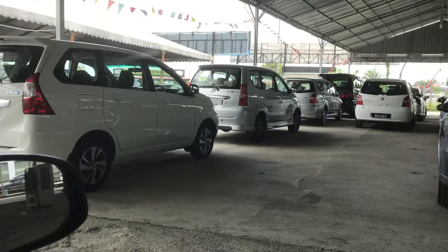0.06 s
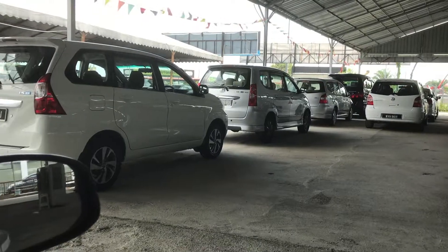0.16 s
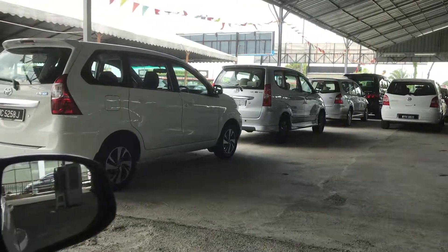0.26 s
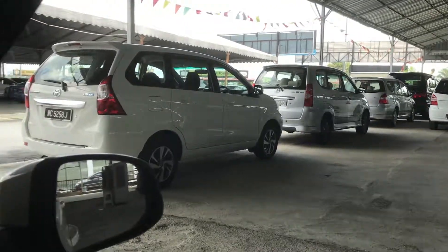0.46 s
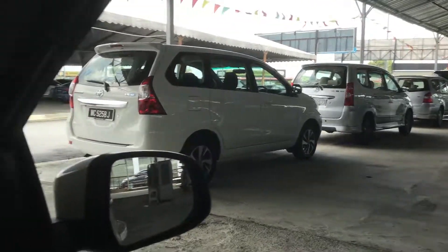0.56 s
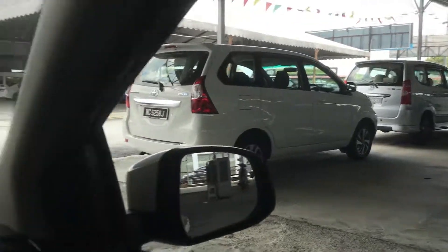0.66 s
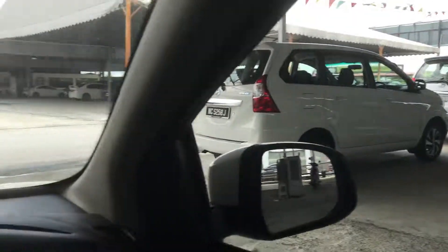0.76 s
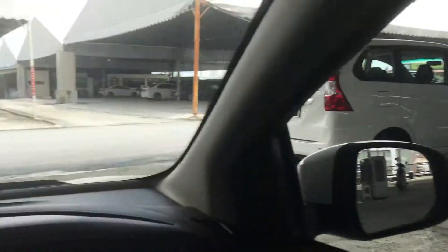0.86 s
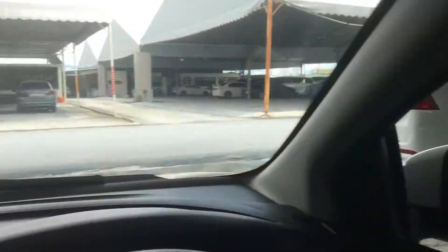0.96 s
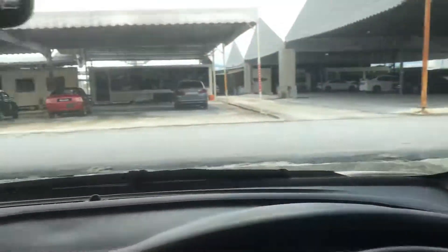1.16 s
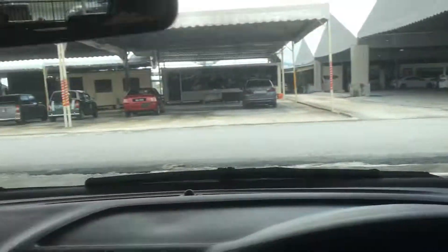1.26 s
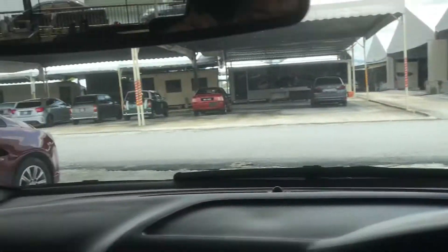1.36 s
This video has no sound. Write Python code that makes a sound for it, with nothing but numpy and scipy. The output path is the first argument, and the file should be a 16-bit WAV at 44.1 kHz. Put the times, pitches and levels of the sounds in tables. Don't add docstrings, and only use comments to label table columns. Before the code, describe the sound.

Inside a parked, idling car, a window motor whines for a moment, the door thumps as the glass stops, faint clicks follow, then a single snappy knock; soft rumble and fan hiss continue around the in-cabin microphone.

```python
import sys
import numpy as np
from scipy import signal
from scipy.fft import rfft, irfft, next_fast_len
from scipy.io import wavfile

SR = 44100
rng = np.random.default_rng(int(sys.argv[2]) if len(sys.argv) > 2 else 0)


def undo_db(level):
    steps = np.asarray(level, float) / 20
    return 10 ** steps


def store_pcm(level_fs):
    pcm = np.round(np.clip(level_fs, -1, 1) * 32767).astype(np.int16)
    wavfile.write(sys.argv[1], SR, np.atleast_2d(pcm).T)


N = 61739
T = np.arange(N) / SR
FFT_SIZE = next_fast_len(N + 4096)
DRIFT_DB, GRIT_DB = 1.1, 2.5


def evened(x):
    return x / np.sqrt(np.mean(x ** 2) + 1e-20)


def white():
    return rng.standard_normal(N)


def curve(rows, col=1):
    rows = np.array(rows, float)
    return np.interp(T, rows[:, 0], rows[:, col])


def wander(rate_hz):
    f, t = np.geomspace(rate_hz / 20, rate_hz, num=24), T[::64]
    sines = np.sin(2 * np.pi * (f[:, None] * t + rng.random((24, 1))))
    slow = (sines / np.sqrt(f)[:, None]).sum(0)
    return evened(np.interp(T, t, slow))


def coloured(x, points):
    f, db = np.transpose(points)
    hz = np.fft.rfftfreq(FFT_SIZE, 1 / SR)
    gain = undo_db(np.interp(np.log(hz + 1), np.log(f + 1), db, -80, -80))
    return evened(irfft(rfft(x, FFT_SIZE) * gain, FFT_SIZE)[:N])


def resonate(x, hz, width):
    turn = np.exp(2j * np.pi * np.cumsum(hz * np.ones(len(x))) / SR)
    r = np.exp(-np.pi * width / SR)
    return 2 * (turn * signal.lfilter([1 - r], [1, -r], x / turn)).real


def grit(per_s, spread_db):
    grains = rng.random(N) < per_s / SR
    strength = undo_db(spread_db * np.minimum(rng.exponential(1, N), 4))
    return white() * (1 + grains * strength)


# pitch in Hz, level in dB, waver in dB.
ENGINE_TONES = [(27.3, -58, 2.5), (87, -52, 2.5), (134.2, -42.5, .8)]
# time in seconds, level of the highest engine tone in dB.
CABIN_BOOM = [(0, -5), (.4, -4), (.58, -7), (.7, 0), (1.0, 0), (1.22, -1), (1.4, -4)]
# pitch in Hz, level in dB, beat period in seconds,
# loudest moment in seconds, beat depth (0 to 1).
ENGINE_BEAT = (55.7, -39.5, .245, .605, .8)
# frequency in Hz, level in dB per Hz.
RUMBLE_COLOUR = [(20, -7), (110, -2), (190, -10), (280, -13), (450, -24.5), (1170, -32.5), (1500, -35),
                 (2600, -47.5)]
# pitch in Hz, width in Hz, level in dB.
FAN_WHISTLES = [(1450, 25, -75), (1350, 200, -77), (1880, 60, -80)]
# frequency in Hz, level in dB per Hz.
HISS_COLOUR = [(1180, -26.5), (2000, -1), (4980, -3.5), (6920, -2.5), (9800, -4.5), (10700, -10.5),
               (11900, 0), (13200, -11), (15900, -1)]
# time in seconds, level in dB.
HISS_LEVEL = [(0, -8), (.38, -4), (.6, -2.5), (.72, -2.5), (.78, 2), (.9, -0.5), (1.0, 0), (1.1, 0.5),
              (1.4, 1)]


def engine():
    lift_db = [0] * (len(ENGINE_TONES) - 1) + [curve(CABIN_BOOM)]
    out = np.zeros(N)
    for (hz, db, waver_db), lift in zip(ENGINE_TONES, lift_db):
        level = undo_db(db + lift + waver_db * wander(7.2))
        cycles = hz * T + rng.random() + 0.041 * wander(5.94)
        out += level * np.sqrt(2) * np.sin(2 * np.pi * cycles)
    hz, db, period_s, loud_s, depth = ENGINE_BEAT
    beat = 1 - depth + depth * np.cos(np.pi * (T - loud_s) / period_s) ** 2
    level = undo_db(db + DRIFT_DB * wander(7.15)) * beat
    return out + level * np.sqrt(2) * np.sin(2 * np.pi * (hz * T + 0.18 * wander(7.96)))


def cabin_air():
    rumble_db, hiss_db, whistle_rise_db = -47, -68, 7
    out = undo_db(rumble_db + DRIFT_DB * wander(20)) * coloured(white(), RUMBLE_COLOUR)
    rise_db = whistle_rise_db * (T / T[-1] - .5)
    for hz, width, db in FAN_WHISTLES:
        out += undo_db(db + rise_db + DRIFT_DB * wander(45)) * evened(resonate(white(), hz, width))
    hiss_level = undo_db(hiss_db + curve(HISS_LEVEL) + DRIFT_DB * wander(150))
    return out + hiss_level * coloured(grit(500, GRIT_DB), HISS_COLOUR)


# start in seconds, level in dB, time to fade by 60 dB in seconds,
# what is hit (its place in the list inside ticks, from 0).
TICK_EVENTS = [(.093, -55, .06, 3), (.212, -53, .07, 3), (.246, -53, .09, 3), (.3055, -40.5, .04, 0),
               (.3395, -54, .025, 0), (.4585, -50, .04, 1), (.4725, -59, .035, 1), (.66, -61, .15, 4),
               (.9, -63, .2, 5), (.975, -72, .3, 6), (1.069, -64, .09, 2)]
# pitch in Hz, width in Hz, level in dB.
GLASS_BODY = [(1100, 600, -1), (2300, 600, -2), (3000, 500, 0), (3850, 400, 3), (5500, 1500, -14)]
RELAY_BODY = [(1400, 400, 0), (2400, 350, -2), (3600, 600, -12), (5500, 800, -12)]
TRIM_BODY = [(3300, 450, -0.73), (4000, 660, -2.6)]
JUDDER_BODY = [(1450, 500, 0), (2200, 1100, -2), (3000, 1000, -6)]
SEAT_LOW_BODY = [(460, 180, 0)]
SEAT_HIGH_BODY = [(860, 150, 0)]
CLOTH_BODY = [(6650, 900, 0)]


def ticks():
    bodies = (GLASS_BODY, RELAY_BODY, TRIM_BODY, JUDDER_BODY, SEAT_LOW_BODY, SEAT_HIGH_BODY, CLOTH_BODY)
    out, t = np.zeros(N), T[:9000]
    for start_s, db, fade_s, which in TICK_EVENTS:
        noise = rng.standard_normal(len(t))
        shape = undo_db(-60 * t / fade_s) * np.minimum(20 * t / fade_s, 1)
        shape_rms = np.sqrt(np.mean(shape ** 2))
        for hz, width, gain_db in bodies[round(which)]:
            ring = resonate(resonate(noise, hz, width), hz, width)
            burst = evened(shape * ring) * shape_rms
            out[round(start_s * SR):][:len(t)] += undo_db(db + gain_db) * burst
    return out


# pitch in Hz, level in dB, time to fade by 60 dB in seconds.
KNOCK_RINGS = [(450, -4, .02), (240, -12, .03), (6300, -28, .008)]


def knock():
    start_s, level_db, snap_s, top_hz, rebound = 1.1282, -31.5, .00006, 3800, .45
    t = np.maximum(T - start_s, 0)
    u = t / snap_s
    rings = sum(undo_db(db - 60 * t / fade_s) * np.sin(2 * np.pi * hz * t) for hz, db, fade_s in KNOCK_RINGS)
    pulse = np.e * u * (1 - rebound * u) * np.exp(-np.minimum(u, 99))
    snap = signal.lfilter(*signal.butter(2, top_hz, fs=SR), pulse)
    return undo_db(level_db) * (rings - snap)


# pitch in Hz, peak level in dB,
# time to fade by 60 dB in seconds, delay in seconds, swell time in seconds.
DOOR_PANELS = [(87, -13.5, .16, .002, .005), (170, -22, .22, .0002, .008), (262, -23, .06, .0001, .003),
               (310, -23, .055, .0015, .003), (112, -15, .12, .004, .005), (170, -23, .15, .0293, .003),
               (200, -31, .15, .07, .01), (106, -33, .9, .1, .05)]
# frequency in Hz, level in dB per Hz.
SHUDDER_COLOUR = [(50, -40), (100, -2), (250, 1), (420, -15.5), (800, -21), (1500, -28.5)]


def thump():
    stop_s, shudder_db, shudder_fade_s = .3085, -27.5, .28
    t = np.maximum(T - stop_s, 0)
    shudder_level = undo_db(shudder_db - 60 * t / shudder_fade_s) * np.minimum(t / .008, 1)
    out = shudder_level * coloured(white(), SHUDDER_COLOUR)
    for hz, db, fade_s, delay_s, swell_s in DOOR_PANELS:
        t = np.maximum(T - stop_s - delay_s, 0)
        out -= undo_db(db - 60 * t / fade_s) * (1 - np.exp(-t / swell_s)) * np.sin(2 * np.pi * hz * t)
    return out


# start, loudest moment and end in seconds, level in dB.
GROAN = (.34, .361, .395, -46)
# pitch in Hz, width in Hz, level in dB.
GROAN_RINGS = [(400, 250, -1), (770, 130, -1), (1370, 250, -5), (1830, 260, 2), (2300, 300, -9)]


def stall():
    start_s, peak_s, end_s, level_db = GROAN
    rub = grit(2000, 2 * GRIT_DB)
    sag = 1 - .15 * np.clip((T - peak_s) / (end_s - start_s), -1, 1)
    ring = np.zeros(N)
    for hz, width, db in GROAN_RINGS:
        ring += undo_db(db) * evened(resonate(resonate(rub, hz * sag, width), hz * sag, 2 * width))
    shape = np.interp(T, [start_s, start_s + .003, peak_s, end_s], [0, 0.77, 1, 0.016]) ** 2
    return undo_db(level_db) * shape * evened(ring)


# frequency in Hz, level in dB per Hz.
SCRAPE_COLOUR = [(880, -31), (1500, -5), (1940, -12), (2610, -8.5), (4070, -9), (4500, -11), (4820, -8.5),
                 (13200, -18), (15900, -19)]
# pitch in Hz, width in Hz, level in dB.
GLASS_RINGS = [(2250, 250, -15), (2650, 120, -17), (3550, 200, -15), (4420, 110, -14)]
# start and end in seconds, first and last pitch in Hz, width in Hz, level in dB.
SEAL_SQUEAK = (.09, .155, 8900, 8600, 200, -64)


def seal():
    rub = grit(1200, GRIT_DB)
    scrape = coloured(rub, SCRAPE_COLOUR)
    for hz, width, db in GLASS_RINGS:
        scrape += undo_db(db + 1.5 * wander(25)) * evened(resonate(rub, hz, width))
    level = undo_db(curve(WINDOW_RUN, col=3) + DRIFT_DB * wander(82.8))
    start_s, end_s, first_hz, last_hz, width, db = SEAL_SQUEAK
    u = np.clip((T - start_s) / (end_s - start_s), 0, 1)
    squeak = evened(resonate(white(), first_hz + (last_hz - first_hz) * u, width))
    return level * scrape + undo_db(db) * abs(np.sin(np.pi * u)) ** .5 * squeak


# time in seconds, pitch of the motor's second line in Hz,
# motor level in dB, seal scrape level in dB.
WINDOW_RUN = [
    (0, 1408, -43.5, -51),
    (.13, 1396, -48, -50),
    (.22, 1396, -46, -50.5),
    (.27, 1382, -47.5, -47.5),
    (.309, 1389, -45, -47.5),
    (.317, 1360, -54, -61.5),
    (.36, 1326, -45, -66),
    (.385, 1310, -89, -82),
    (.42, 1290, -86, -100),
]
# multiple of the commutator (switching contact) rate, level in dB.
MOTOR_LINES = [(.9, -9), (1, -2), (1.7, -14), (2, -1)]
# frequency in Hz, level in dB per Hz.
GEAR_COLOUR = [(60, -23), (150, 0.5), (300, -10), (550, -16), (1100, -17), (1400, -14.5), (2000, -24),
               (5000, -43)]


def motor():
    lines_db, waver_db, fuzz_hz, fuzz_share = -5, 1.1, 20, .25
    hz = curve(WINDOW_RUN) / 2
    turns = np.cumsum(hz) / SR
    whine = np.zeros(N)
    for k, db in MOTOR_LINES:
        clean = np.sqrt(2) * np.sin(2 * np.pi * (k * turns + rng.random()))
        fuzz = evened(resonate(white(), k * hz, k * fuzz_hz))
        whine += undo_db(lines_db + db + waver_db * wander(43)) * (clean + fuzz_share * fuzz)
    shaft = 1 + 0.27 * np.cos(2 * np.pi * turns / 8)
    gears = coloured(grit(900, GRIT_DB) * shaft, GEAR_COLOUR) * undo_db(DRIFT_DB * wander(30.3))
    return undo_db(curve(WINDOW_RUN, col=2)) * (whine + undo_db(3.5) * gears)


def scene():
    background = engine() + cabin_air()
    hits = ticks() + knock() + thump()
    window = stall() + seal() + motor()
    return (background + hits + window)[None]


def low_pass(x):
    return signal.sosfilt(signal.butter(12, 16090, fs=SR, output="sos"), x)


# frequency in Hz, width in Hz, depth in dB.
PORT_DIPS = [(4950, 390, 3.9), (10520, 480, 3.6)]


def record(dry):
    top_edge_hz = 15750
    hz = np.fft.rfftfreq(FFT_SIZE, 1 / SR)
    loss_db = 80 * (hz > top_edge_hz)
    loss_db = loss_db + sum(db * np.exp(-((hz - f) / width) ** 2) for f, width, db in PORT_DIPS)
    mix = irfft(rfft(dry, FFT_SIZE, axis=1) * undo_db(-loss_db), FFT_SIZE, axis=1)[:, :N]
    return low_pass(mix)


dry = scene()
out = record(dry)
store_pcm(out)
```